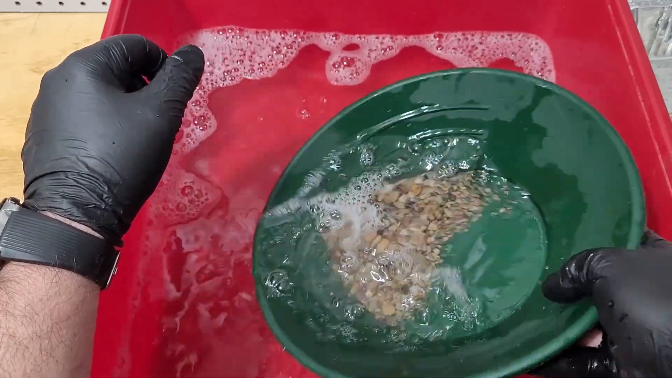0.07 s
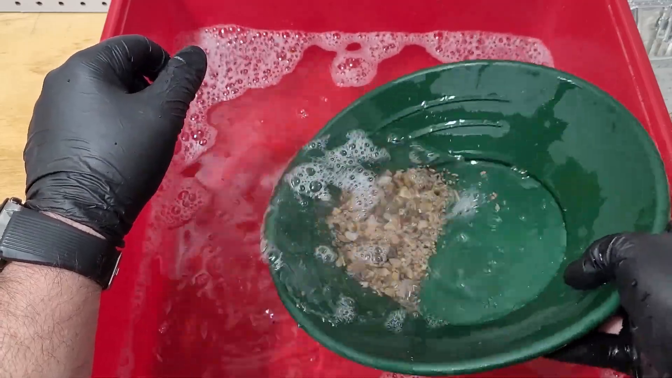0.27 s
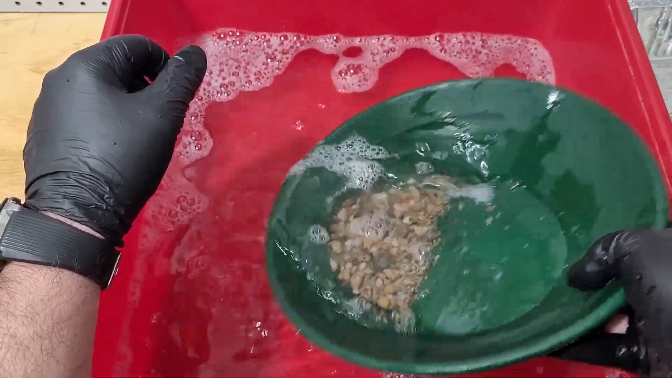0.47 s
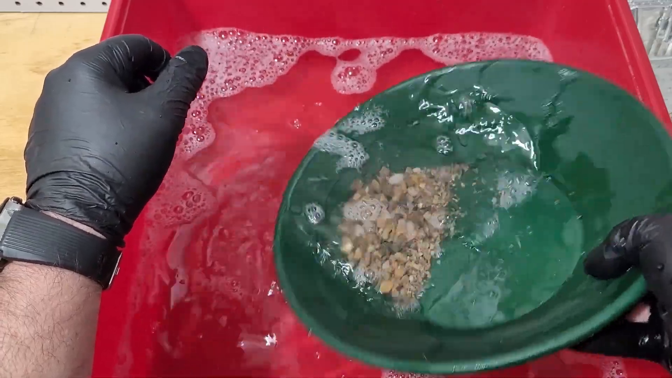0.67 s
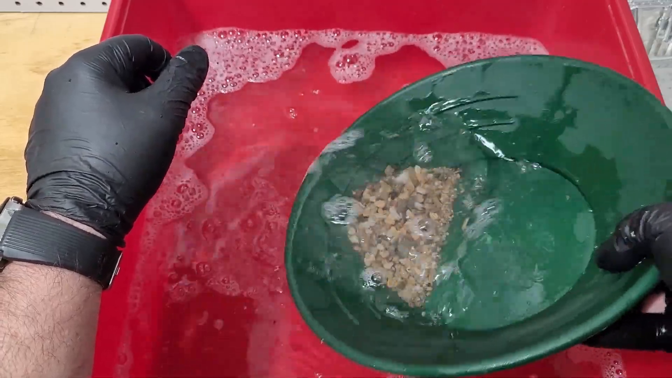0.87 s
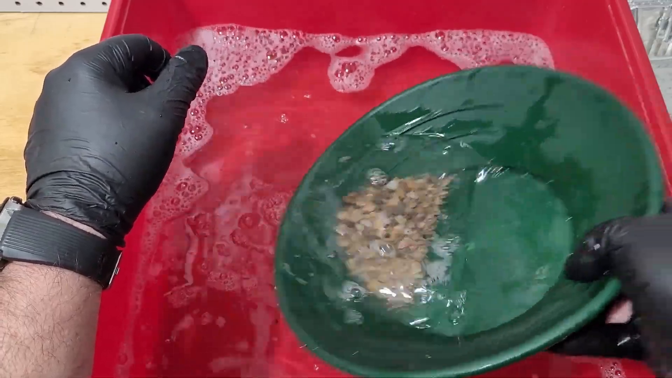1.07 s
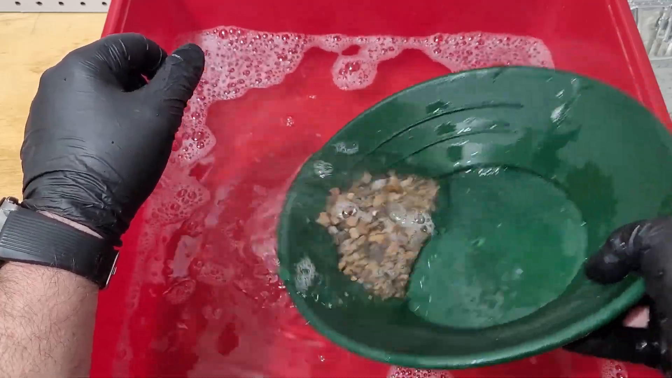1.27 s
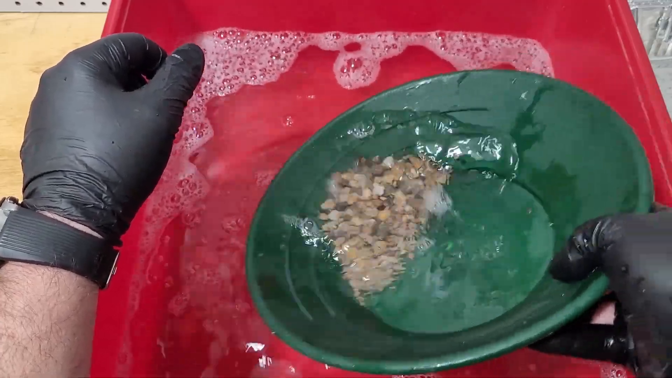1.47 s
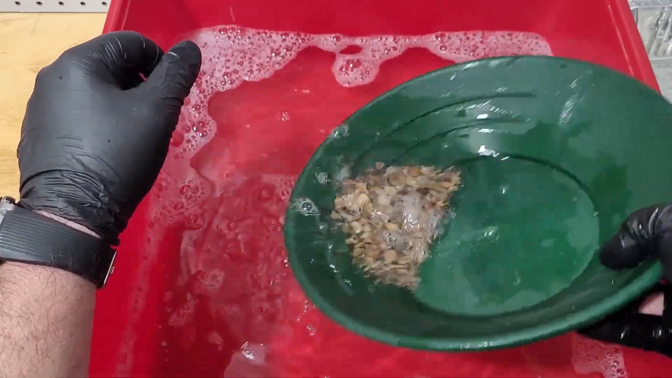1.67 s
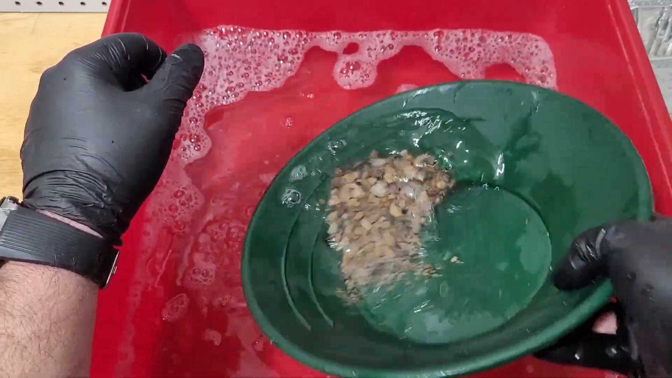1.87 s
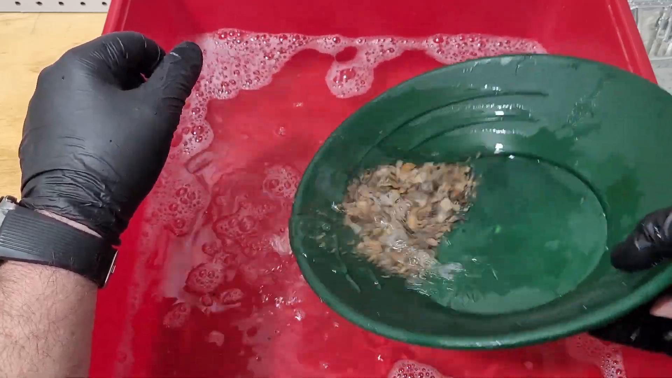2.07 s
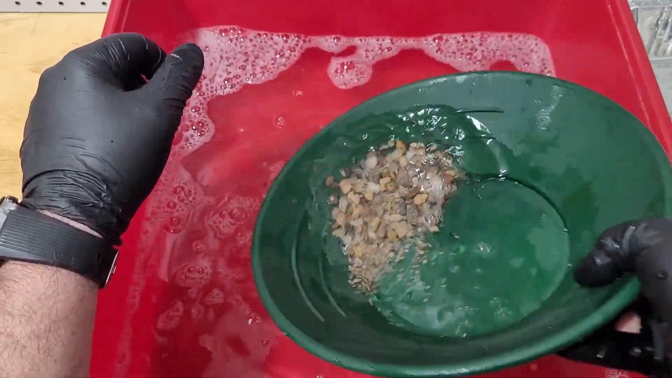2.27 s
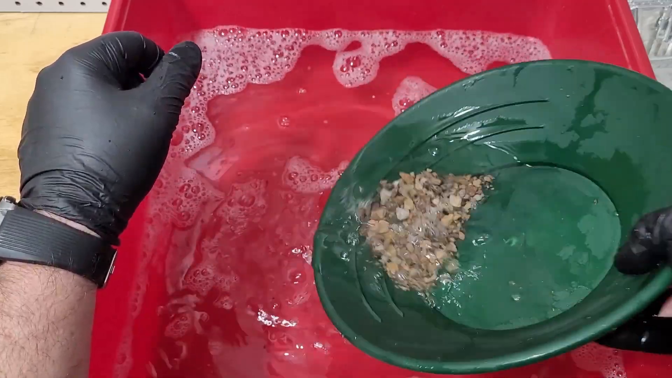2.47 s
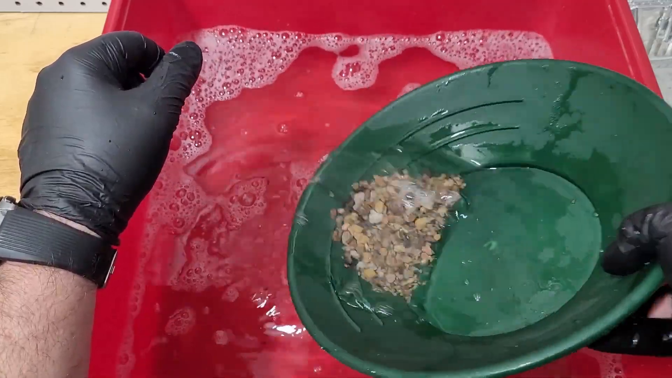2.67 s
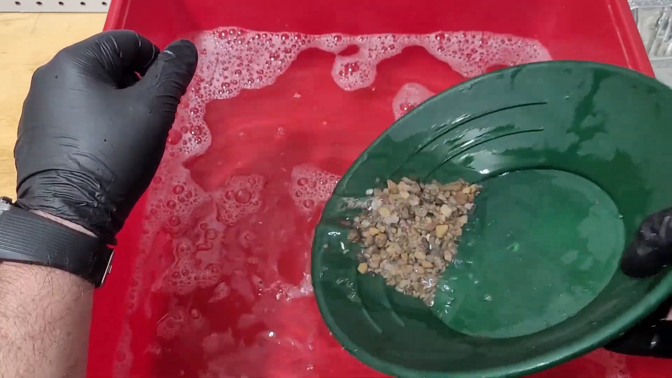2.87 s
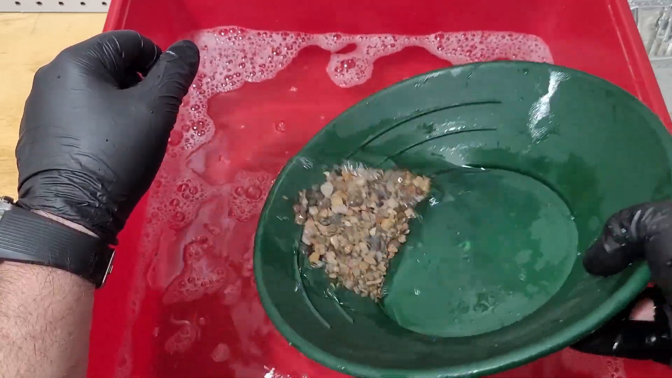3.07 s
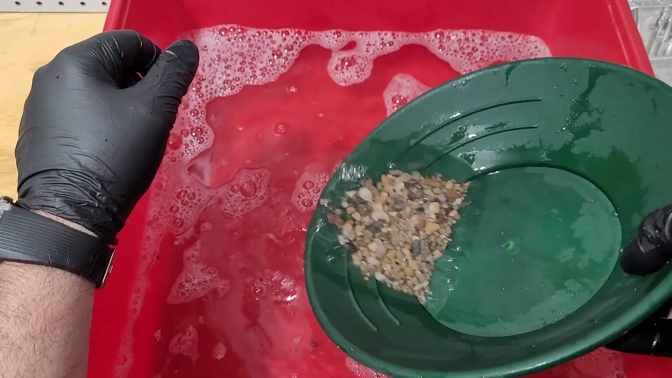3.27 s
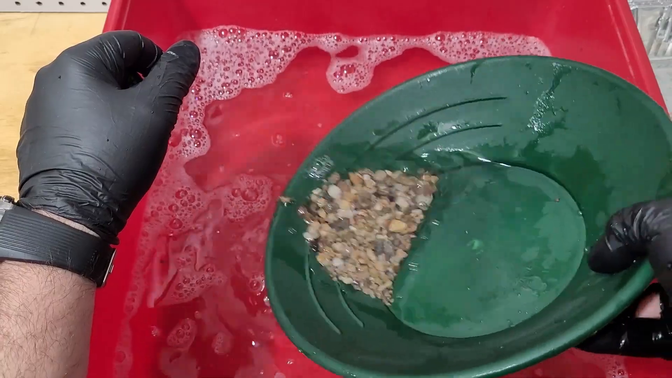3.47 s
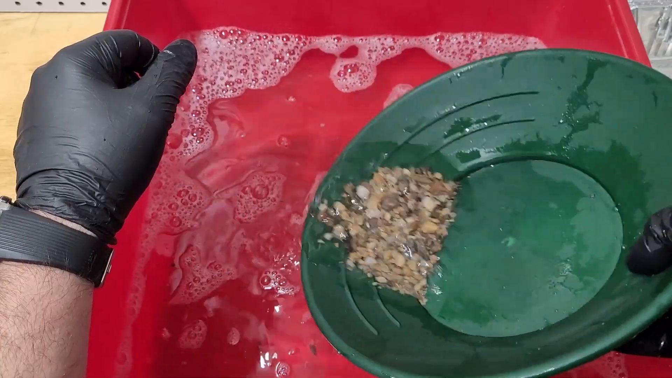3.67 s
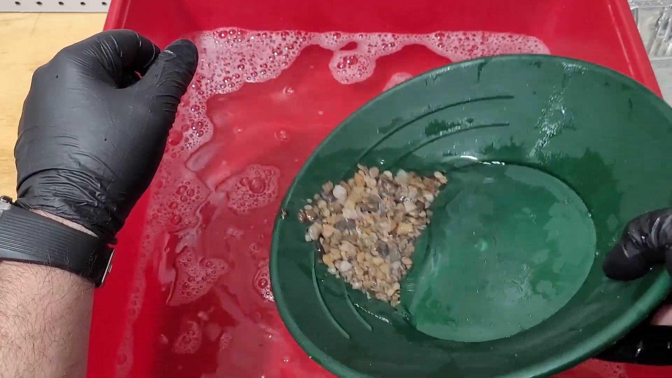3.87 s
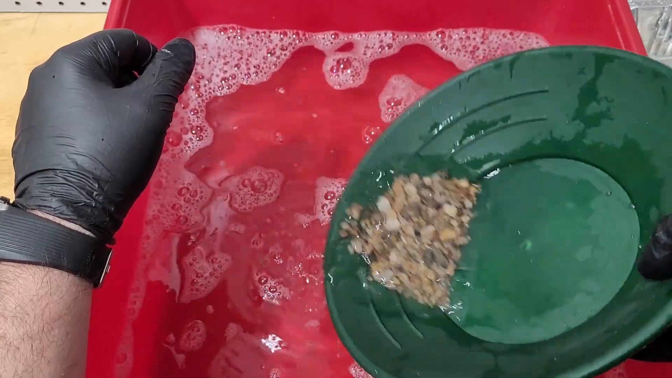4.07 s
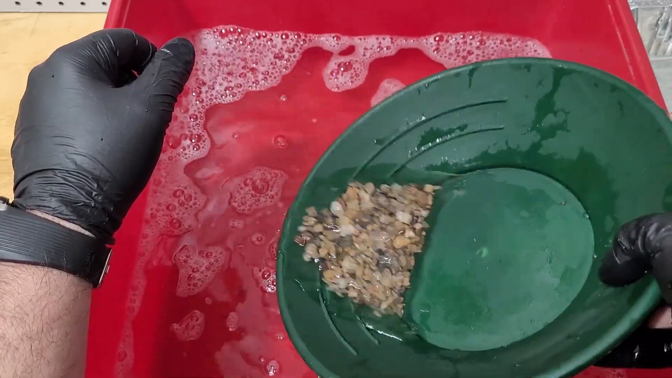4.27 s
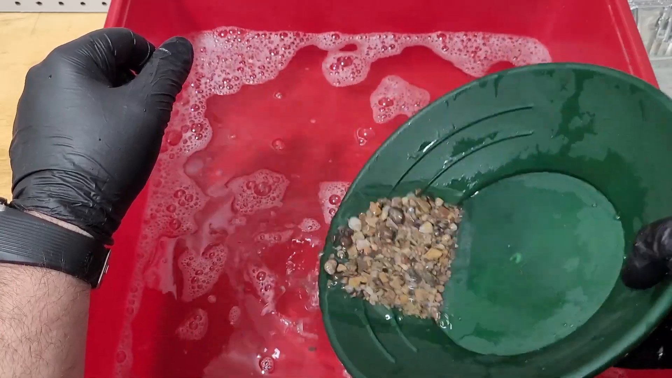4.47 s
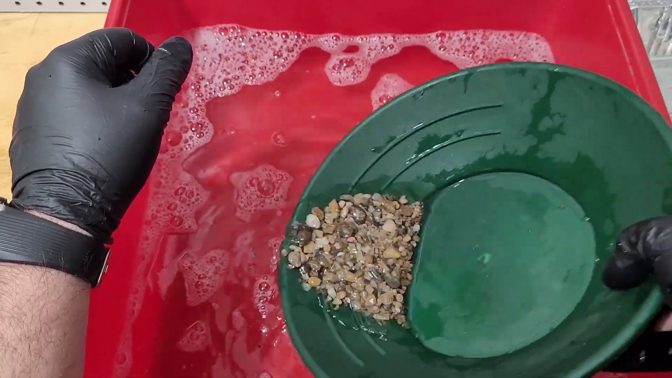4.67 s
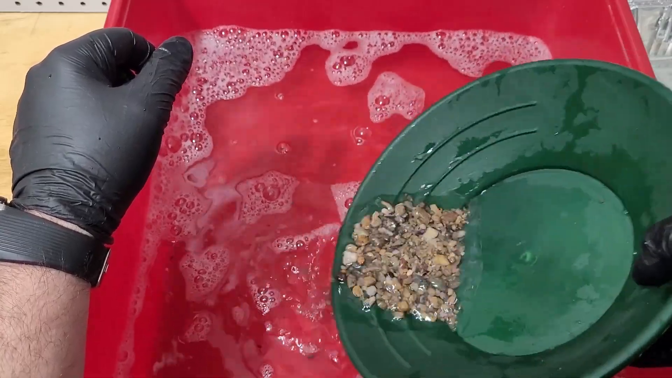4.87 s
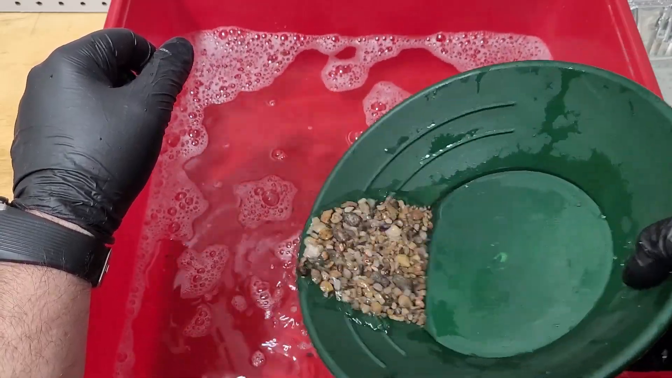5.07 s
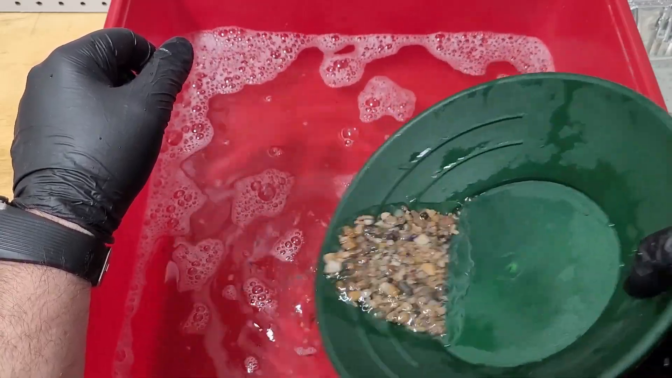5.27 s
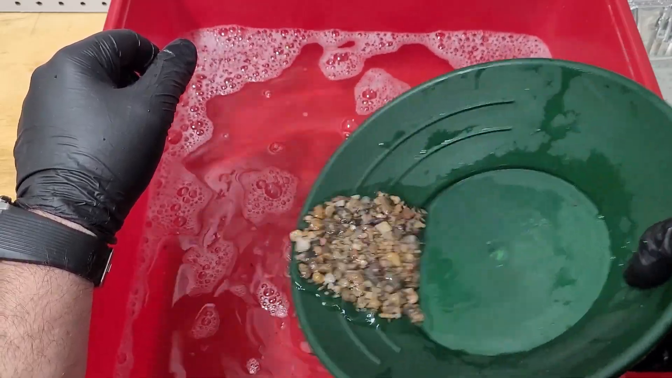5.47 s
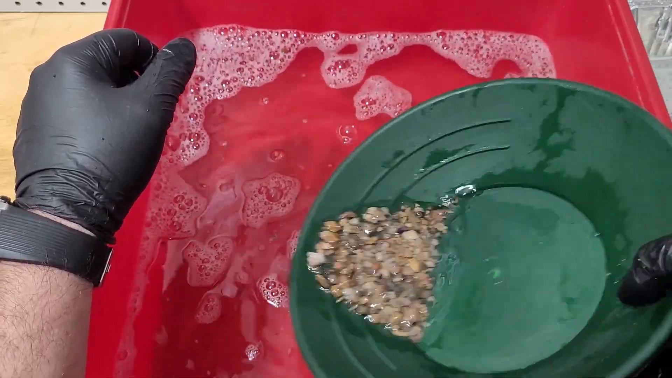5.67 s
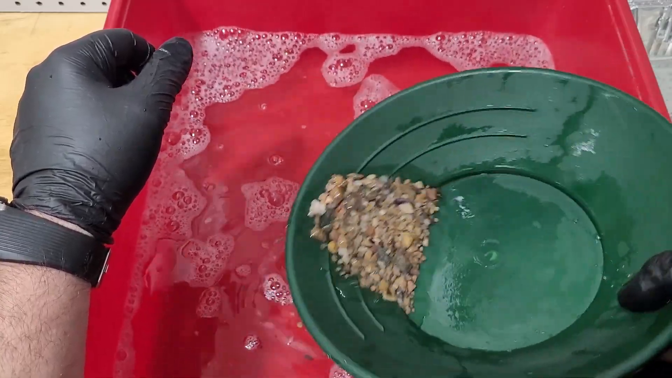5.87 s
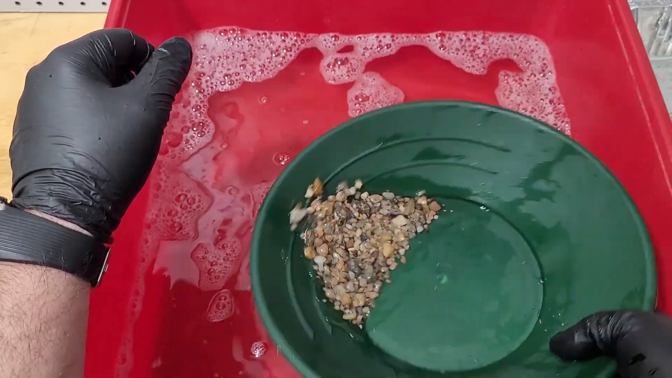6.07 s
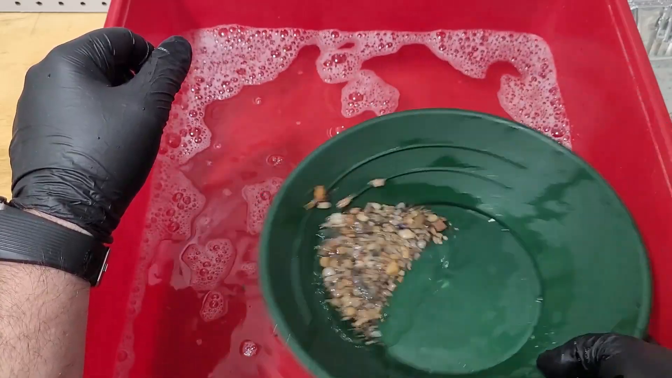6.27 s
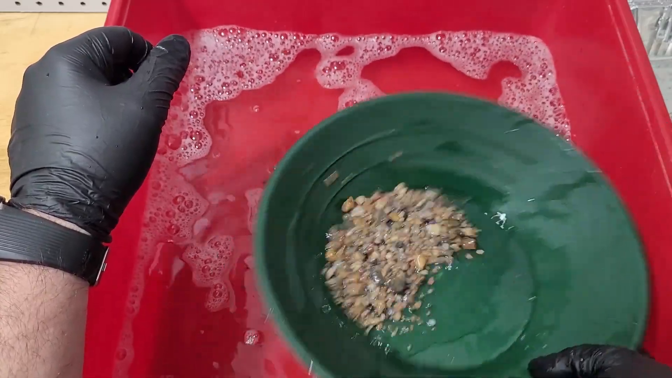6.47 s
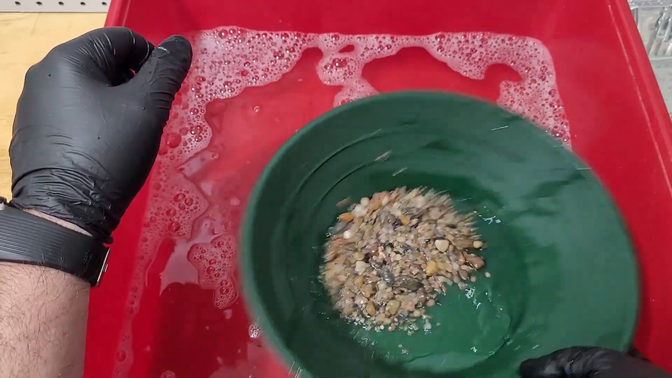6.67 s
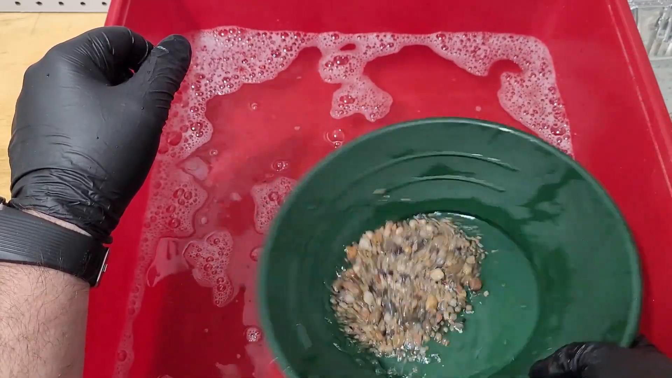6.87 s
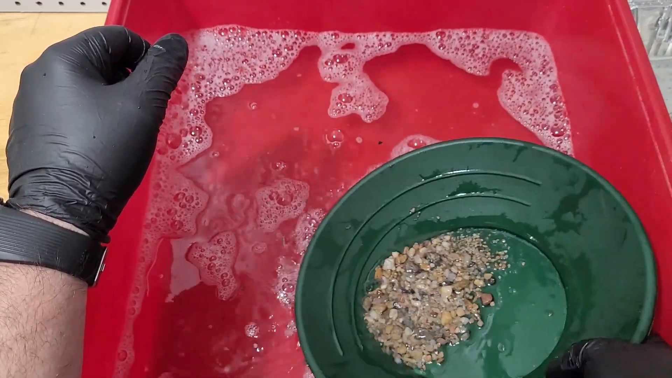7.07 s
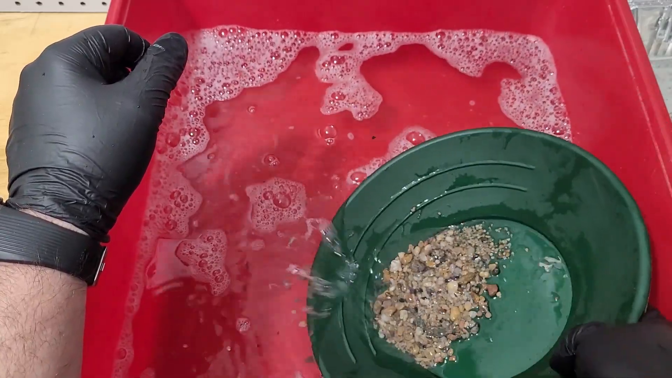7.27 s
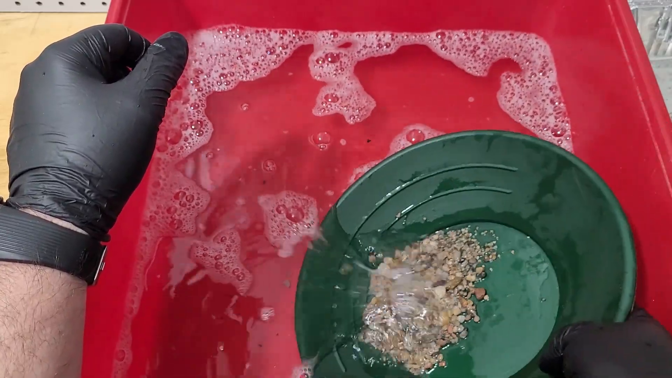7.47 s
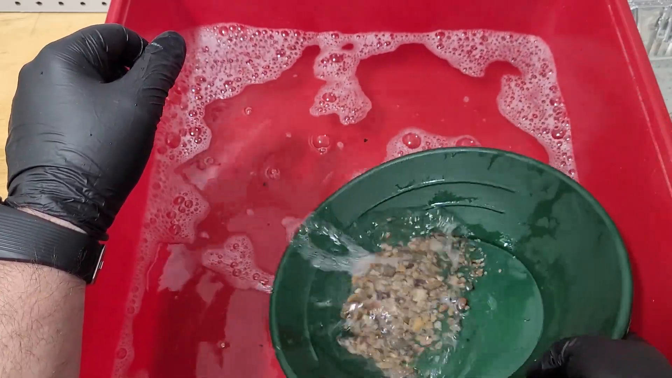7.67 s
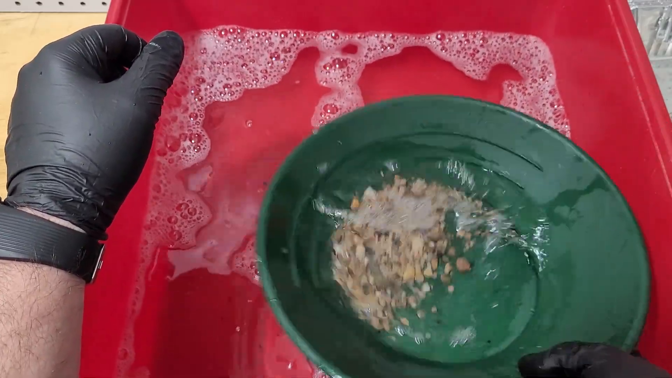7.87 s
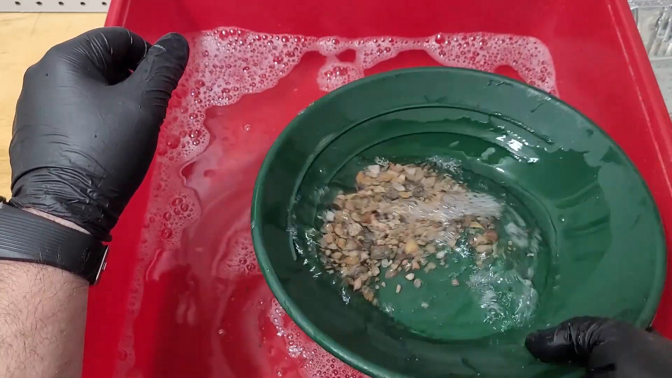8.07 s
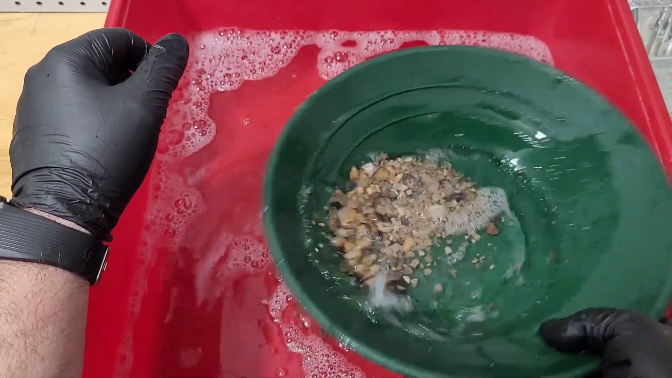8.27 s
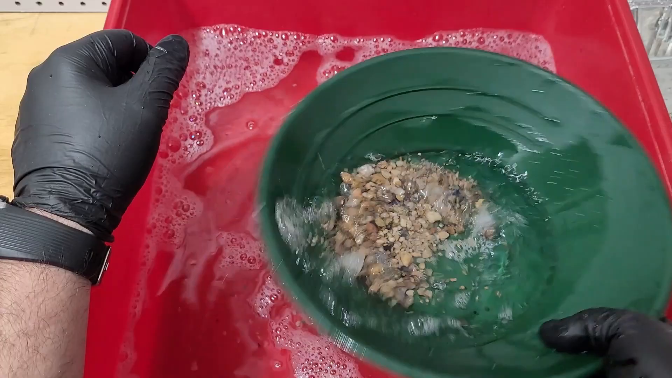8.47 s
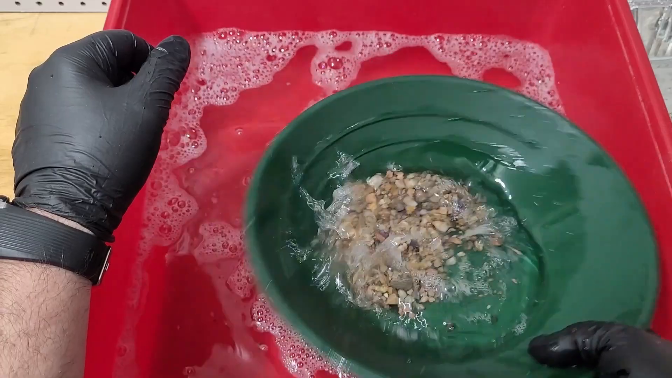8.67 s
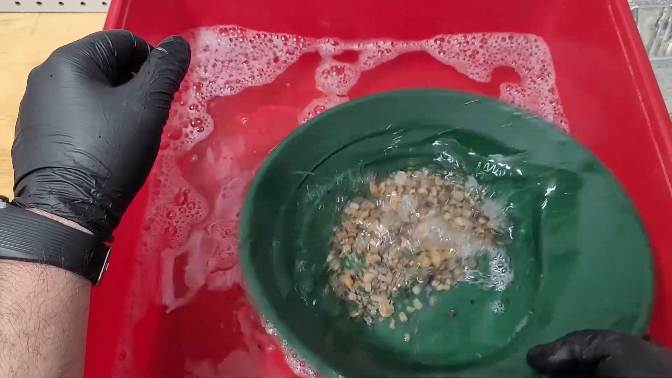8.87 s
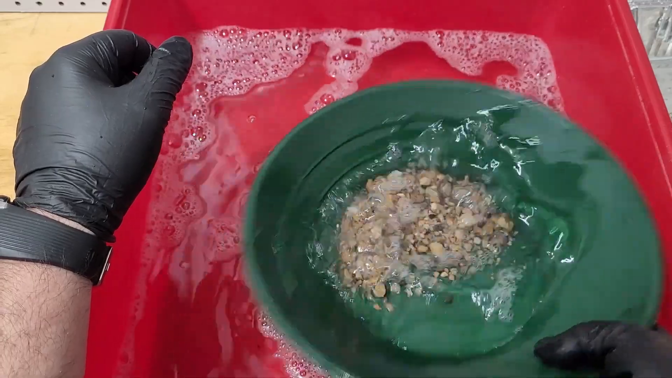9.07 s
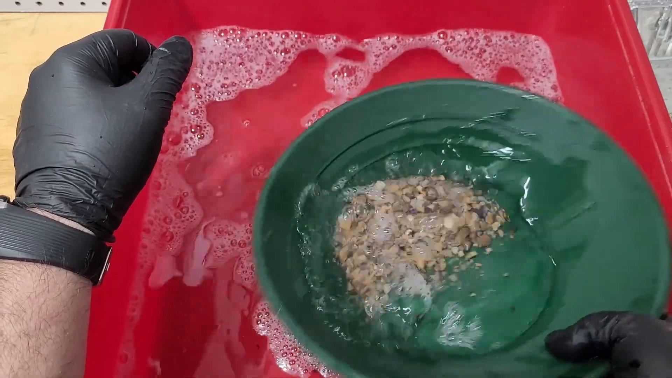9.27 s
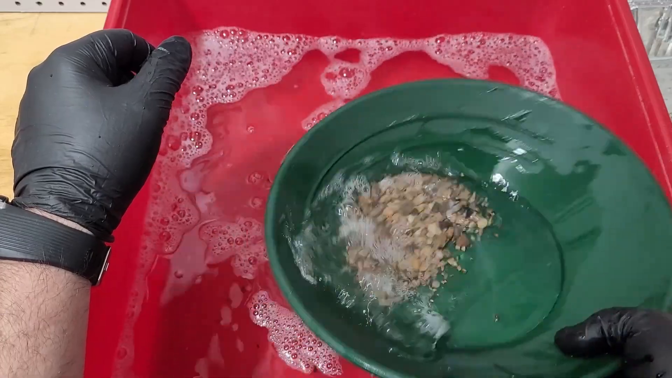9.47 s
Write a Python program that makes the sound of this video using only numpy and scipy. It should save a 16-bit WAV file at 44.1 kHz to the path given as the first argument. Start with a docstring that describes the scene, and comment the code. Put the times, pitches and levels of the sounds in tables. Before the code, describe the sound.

Wet gravel scrapes and rattles in a plastic pan, shaken rhythmically with sloshing water, then faster and louder, with a brief splashy dip between spells.

```python
"""At a tub of water, heard close up in stereo: a plastic pan of wet gravel is shaken, then swung more slowly,
then shaken fast in two spells with a dip of water between. Each stroke drags sand and pebbles over the pan:
dense random clicks are coloured and ring its wall modes. Waves slap the pan and boom in the tub as decaying
noise; air pockets and bubbles ring as sliding sines, low gulps and one high ping. Drops burst in noise and
ping, stones clack, water fizzes in, all over a quiet filtered-noise background."""
import sys
import numpy as np
from scipy import signal
from scipy.fft import rfft, irfft
from scipy.io import wavfile
from scipy.ndimage import uniform_filter1d

SR = 44100
rng = np.random.default_rng(int(sys.argv[2]) if len(sys.argv) > 2 else 0)


def waveform_to_disk(signal):
    """Save audio, clipped to [-1, 1], as 16-bit WAV at the path in sys.argv[1]."""
    frames = np.transpose(np.atleast_2d(signal))
    scaled = np.clip(frames, -1, 1) * 32767
    samples = np.round(scaled).astype(np.int16)
    wavfile.write(sys.argv[1], SR, samples)


N = 420273  # length in samples

# Levels in the tables and settings are nominal: each layer and the final mix trim them further.

# distant surroundings, spectral outline: (f/Hz, relative level/dB)
BACKGROUND = [(25, -19), (60, 0), (115, 2), (190, -6), (280, -2), (450, -2), (640, -9), (800, -1),
              (1200, -17), (2300, -20), (4500, -9), (6500, -12), (7500, -20), (15500, -19)]
# modes of the tub of water: (f/Hz, level/dB, t60/s)
TUB_MODES = [(80.5, -11.5, 0.37), (110, -17, 0.23), (127, -3.5, 0.26), (182, -5.5, 0.23), (223, -9, 0.24),
             (270, -11, 0.34), (319.5, 6, 0.14), (366, -4, 0.1)]
# waves slapping the pan: (t/s, slap level/dB, boom level of the tub/dB)
SLAPS = [(0.241, -49, -76), (0.535, -45, -71), (1.235, -42, -71.5), (1.512, -34, -70), (1.925, -37.5, -71),
         (2.252, -43.5, -67), (2.304, -35, -67), (2.68, -43, -56), (3.041, -37.5, -55), (3.085, -63, -61),
         (3.424, -65, -66.5), (3.884, -49.5, -65), (4.263, -46, -55.5), (4.616, -37, -65.5),
         (4.972, -31.5, -60), (4.989, -43, -51.5), (5.455, -48, -70), (5.723, -39, -64), (7.765, -68, -95),
         (8.677, -46.5, -87)]
# air pockets and bubbles ringing in the water, low gulps and one high ping: (t/s, f/Hz, level/dB, t60/s)
GULPS = [(2.624, 813, -43, 0.088), (2.678, 773, -25.5, 0.06), (2.690, 749, -29, 0.084),
         (3.039, 845, -28.5, 0.037), (3.503, 855, -47.5, 0.14), (3.883, 803, -30, 0.049),
         (4.261, 884, -37, 0.054), (4.655, 745, -52, 0.39), (6.508, 596, -30, 0.041),
         (7.108, 625, -56, 0.069), (7.14, 3320, -64, 0.06), (7.767, 603, -58, 0.048),
         (9.056, 457, -46.5, 0.23)]
# loudest drops and bursting bubbles: (t/s, level/dB, bubble f/Hz, fine mist level/dB)
DROPS = [(0.243, -43.5, 3840, -61), (0.534, -38.5, 3250, -42), (1.2066, -48, 3120, -59),
         (1.2445, -28.5, 6150, -35.5), (1.606, -42, 3870, -50), (2.253, -30.5, 3200, -58),
         (2.6239, -41, 3180, -47), (2.6788, -24.5, 5540, -45), (2.7614, -49, 3700, -65),
         (3.0195, -33.5, 4040, -48), (3.0794, -28, 3690, -44), (3.0823, -29.5, 7000, -40),
         (3.2728, -41, 7700, -48), (3.405, -42, 6800, -59), (3.434, -39, 7400, -49),
         (3.453, -40, 5460, -54), (3.476, -55, 7960, -43.5), (3.501, -52, 6400, -58),
         (4.1817, -52, 6600, -75), (4.262, -37.5, 4380, -40.5), (4.553, -55, 8300, -43),
         (4.9787, -35.5, 6560, -45), (7.139, -58, 3350, -62), (7.673, -58, 4000, -75),
         (7.7136, -51, 3770, -77), (8.139, -53, 8800, -44), (8.5314, -35.5, 6190, -44),
         (8.7053, -34, 7200, -47), (8.8868, -29.5, 3950, -42), (8.9062, -32, 3450, -48)]
# spray of a drop, spectral outline: (f/Hz, relative level/dB)
SPRAY = [(300, -24.5), (2000, -10), (3600, 7.5), (5000, 1), (6800, 8), (9000, -21), (13000, -7),
         (16000, -41)]
# fine mist of a drop, spectral outline: (f/Hz, relative level/dB)
MIST = [(3000, -5.5), (7000, -4.5), (9500, 10), (13000, 6), (16000, -19.5)]
# larger stones clacking on the pan: (t/s, level/dB)
STONES = [(1.5179, -35), (1.8832, -30.5), (2.977, -52), (4.9324, -39), (3.0385, -34), (3.8825, -40.5),
          (4.9601, -30.5), (5.0496, -36), (6.2257, -44), (6.5292, -27), (7.7666, -47), (8.199, -35),
          (8.6747, -35.5), (8.8876, -30), (9.0512, -38.5), (9.38, -34)]
# how much water runs through the load: (t/s, fizz over sand level/dB)
WETNESS = [(0, -6.5), (1.2, -3), (2.3, -7.5), (3, -0.5), (4, -5), (5, -2.5), (6, -10), (7, -16), (7.7, 1.5),
           (8.05, -33), (9.5, -8.5)]
# fizzing water, spectral outline: (f/Hz, relative level/dB)
FIZZ = [(800, -27), (2500, -14), (3300, -3), (4200, -1.5), (5300, -13), (6600, -3), (8000, -3.5),
        (16000, -26)]
# sliding sand, spectral outline: (f/Hz, relative level/dB)
SAND = [(500, -36), (1800, -10), (3400, -1), (5000, -1.5), (5900, -1), (6700, 0), (7500, -2), (9000, 0.5),
        (10700, 0), (11700, -2), (13400, -1), (14300, -7.5), (15000, -12.5), (16000, -24)]
# rattling pebbles, spectral outline: (f/Hz, relative level/dB)
PEBBLES = [(150, -33), (400, -10.5), (900, 1), (1200, -3), (1430, -1), (1720, 1), (2080, 0.5), (2700, -5),
           (3300, -2), (4100, -6), (5200, -14.5), (9000, -17.5), (16000, -26)]
# wall modes of the loaded pan: (f/Hz, level/dB, t60/s)
PAN_MODES = [(323, -17.5, 0.07), (409, -16, 0.067), (450, -9, 0.15), (551.5, 0.5, 0.086),
             (588.5, -5.5, 0.17), (621, -2, 0.083), (692.4, 0.5, 0.059), (749.7, -2.5, 0.14),
             (855.2, 3, 0.083), (934, -6.5, 0.11), (1051, -8, 0.065), (1254, -10, 0.066), (1384, -2, 0.048),
             (1456, 1.5, 0.032), (1680, -2, 0.022), (1910, -2.5, 0.063), (2070, 0, 0.053),
             (2220, 2.5, 0.016), (2410, -3, 0.035), (2590, -7, 0.089), (3246, 4.5, 0.011),
             (3990, -2, 0.019)]
# lift of the pan ring's lower part, its upper part being cut as much: (t/s, level/dB)
PAN_TILT = [(0, 1.5), (1.8, 2.5), (3.5, -4.5), (5, 2), (6.1, -7.5), (6.7, 1), (8.3, 1.5), (9.1, -3)]
# bouts of to-and-fro strokes: (start t/s, end t/s, number of strokes, lengthening per stroke/%,
# dip at the turns/dB, push accent of the sand/dB, pebbles over sand/dB, pan ring over sand/dB,
# push accent of the ring/dB); accents are added on pushes and subtracted on pulls
SHAKES = [(-0.029, 0.506, 4, 5.6, 6.5, -0.6, -4.5, -4.5, 1), (0.508, 1.057, 5, 0.4, 9.5, 0, -3.5, -1, 0.5),
          (1.076, 1.623, 3, 28, 9.5, -0.4, -2, 0, 0), (1.611, 2.516, 5, -7.7, 6, 1.8, -1.5, 0.5, 0),
          (2.521, 5.982, 18, -0.9, 13, 2, 0.7, 3, -1.2), (6.029, 7.02, 10, 1.4, 11, 0.8, 1.8, 0.3, 2),
          (7.968, 9.613, 16, -1.0, 11, -0.4, -1, -2.8, 2.5)]
# vigour of the hand, as the sand in mid stroke before its accent: (t/s, level/dB)
EFFORT = [(0.05, -62.5), (0.44, -55), (0.56, -50.5), (0.7, -56), (1.14, -58), (1.5, -52.5), (2.45, -51.5),
          (2.64, -67), (3.04, -57), (3.25, -58.5), (3.64, -63), (4.23, -65.5), (4.42, -56), (4.9, -53),
          (5.16, -59), (5.7, -53), (5.88, -70), (6.06, -46.5), (6.36, -45), (6.7, -42), (6.98, -46),
          (8.02, -53), (8.5, -46.5), (9.5, -50.5)]

BACKGROUND_DB = -74
TOP_HZ = 15800  # top of the recorder's band and highest bubble pitch
START_DB_PER_S, SETTLE_DB_PER_S = 415, 169  # how fast the load starts before a stroke and settles after
REST_DB = -100  # the load lying still
# the pan is dipped and water runs in over its rim
INFLOW_S, INFLOW_DB, INFLOW_RISE_DB_PER_S, INFLOW_FALL_DB_PER_S = 7.72, -71.5, 114, 45
DROP_T60_S, SLAP_T60_S = 0.031, 0.056


def undb(db):
    """Decibels to gain."""
    return 10 ** (np.asarray(db) / 20)


def unit(x):
    """Scale to rms 1."""
    return x / np.sqrt(np.mean(x ** 2))


def seconds(length):
    """Time axis of a short sound."""
    return np.arange(int(length * SR) + 2) / SR


def fade(t, t60):
    """Exponential decay, 60 dB down after t60."""
    return np.exp(-np.log(1000) * t / t60)


def add(track, at, sound):
    """Mix a sound into the track at a time in seconds."""
    i = int(np.clip(at * SR, 0, N - 1))
    track[i:i + len(sound)] += sound[:N - i]


def through(x, response):
    """Pass a sound through an impulse response."""
    return signal.oaconvolve(x, response)[:len(x)]


def follow(table):
    """Draw a (t/s, level/dB) table out over the whole scene."""
    return np.interp(np.arange(N) / SR, *np.transpose(table))


def colour(points, size=1024):
    """Causal minimum-phase response of unit energy with the given (f/Hz, level/dB) outline."""
    hz, db = np.transpose(points)
    bins = np.maximum(np.arange(size // 2 + 1) * SR / size, 1)
    outline = undb(np.interp(np.log(bins), np.log(hz), db))
    # folding the cepstrum forward makes the response causal
    cepstrum = irfft(np.log(outline))
    cepstrum[1:size // 2] *= 2
    cepstrum[size // 2 + 1:] = 0
    response = irfft(np.exp(rfft(cepstrum)))
    return response / np.linalg.norm(response)


def ring(modes, swell_cycles=0.0102):
    """Unit-energy response of a body: neighbouring modes swing oppositely and build up over swell_cycles."""
    t = seconds(.4)
    response = np.zeros(len(t))
    for k, (hz, db, t60) in enumerate(modes):
        swell = 1 - np.exp(-t * hz / swell_cycles)
        response += (-1) ** k * undb(db) * fade(t, t60) * np.sin(2 * np.pi * hz * t) * swell
    return response / np.linalg.norm(response)


def pan_rings():
    """The heavy load bends the pan in its low modes; single hard pebbles reach the high ones."""
    edge_hz = 1150
    low_modes = [mode for mode in PAN_MODES if mode[0] < edge_hz]
    high_modes = [mode for mode in PAN_MODES if mode[0] >= edge_hz]
    return ring(low_modes), ring(high_modes)


def walk(rate):
    """Random drift with a spread near 1, straight between knots at the given rate per second."""
    knots = np.arange(N) / SR * rate
    return np.interp(knots, np.arange(8000), rng.standard_normal(8000))


def contacts(rate, spread_db):
    """Random clicks of uneven size, mean power 1; the rate per second may move."""
    share = np.clip(rate / SR, 1e-4, 1)
    sign = rng.choice([-1, 1], N)
    size = undb(spread_db * np.minimum(rng.exponential(size=N), 4)) * sign
    # fewer clicks are made larger, so that the rate leaves the level alone
    return unit((rng.random(N) < share) * size / np.sqrt(share))


def bubble(hz, t60, glide, onset_cycles):
    """A ringing air bubble whose pitch slides by the share glide over t60."""
    t = seconds(t60)
    pitch = np.minimum(hz * (1 + glide * t / t60), TOP_HZ)
    swell = 1 - np.exp(-t * hz / onset_cycles)
    return np.sin(2 * np.pi * np.cumsum(pitch) / SR) * fade(t, t60) * swell


def bubbles(level_db, count, low_hz, high_hz, cycles, glide, spread_db):
    """Bubbles of random time, pitch, size and life, following a moving level."""
    out = np.zeros(N)
    for when, pitch, size, life in rng.random((count, 4)):
        hz = low_hz * (high_hz / low_hz) ** pitch
        t60 = cycles * (.5 + life) / hz
        db = level_db[int(when * N)] - spread_db * np.log(max(size, .04))
        add(out, when * N / SR, undb(db) * bubble(hz, t60, glide, 0.97))
    return out


def background():
    """Steady low rumble and faint hiss of the surroundings, as coloured noise."""
    return undb(BACKGROUND_DB) * through(rng.standard_normal(N), colour(BACKGROUND, size=8192))


def reflections(x, t60=0.13, gap_s=0.0019):
    """Short scatter from the tub walls and nearby surfaces, as a decaying noise response."""
    t = seconds(.3)
    tail = rng.standard_normal(len(t)) * fade(t, t60) * (t > gap_s)
    return through(x, tail / np.linalg.norm(tail))


def tub(push_s=0.00078, churn_t60=0.32):
    """Each wave shoves the tub once and churns on; its lowest modes swell last."""
    pushes = np.zeros(N)
    t = seconds(.3)
    for at, _, boom_db in SLAPS:
        shove = np.exp(-t / push_s)
        churn = undb(-12) * rng.standard_normal(len(t)) * fade(t, churn_t60)
        add(pushes, at, undb(boom_db) * (shove + churn))
    # water heaving under the pan
    hollow = colour([(120, -27), (300, -7), (410, -4.5), (520, -1), (800, -27), (4000, -55)])
    boom = through(pushes, ring(TUB_MODES, swell_cycles=2.8))
    return undb(2.5) * boom + undb(3.5) * through(pushes, hollow)


def slaps(rise_s=0.0016):
    """A wave throws the wet load against the pan wall."""
    blows = np.zeros(N)
    t = seconds(.3)
    for at, db, _ in SLAPS:
        swell = 1 - np.exp(-t / rise_s)
        add(blows, at, undb(db) * rng.standard_normal(len(t)) * fade(t, SLAP_T60_S) * swell)
    slosh = colour([(100, -25.5), (250, -18), (450, 8), (650, 5.0), (1200, 2.5), (5000, -46)])
    low_ring, _ = pan_rings()
    wall = undb(-5.5) * through(blows, low_ring)
    rattle = undb(-3.5) * through(blows, colour(PEBBLES))
    return wall + rattle + undb(-3.0) * through(blows, slosh)


def gulps():
    """Air pockets and bubbles ring at a slightly sinking pitch: low gulps and one high ping."""
    out = np.zeros(N)
    for at, hz, db, t60 in GULPS:
        add(out, at, undb(db) * bubble(hz, t60, -0.032, 1.0))
    return out


def drops():
    """Each drop bursts in a short spray and a fine mist, with a pinging bubble."""
    out, spray, mist = np.zeros(N), colour(SPRAY), colour(MIST)
    t = seconds(.08)
    # a hard first crack over a softer, longer patter
    envelope = fade(t, DROP_T60_S) + undb(3.5) * fade(t, 0.0056)
    for at, db, hz, mist_db in DROPS:
        burst = rng.standard_normal((2, len(t))) * envelope
        add(out, at, undb(db - 10.0) * through(burst[0], spray))
        add(out, at, undb(mist_db - 2.5) * through(burst[1], mist))
        add(out, at, undb(db + 1.0) * bubble(hz, .5 * DROP_T60_S, 0.15, 1.4))
    return out


def stones(t60=0.016):
    """A big stone lands, chatters briefly and rings the pan."""
    blows = np.zeros(N)
    t = seconds(.06)
    for at, db in STONES:
        add(blows, at, undb(db) * rng.standard_normal(len(t)) * fade(t, t60))
    low_ring, high_ring = pan_rings()
    clack = undb(-5) * through(blows, colour(PEBBLES))
    return clack + undb(-17.0) * through(blows, high_ring) + undb(-11.5) * through(blows, low_ring)


def inflow(reach_s=0.019, stir_rise_db_per_s=330):
    """Water fizzes in over the rim, then reaches the gravel and stirs it."""
    t = np.arange(N) / SR - INFLOW_S
    late = t - reach_s
    rim_db = INFLOW_DB + np.minimum(INFLOW_RISE_DB_PER_S * t, -INFLOW_FALL_DB_PER_S * t)
    stir_db = INFLOW_DB + np.minimum(stir_rise_db_per_s * late, -INFLOW_FALL_DB_PER_S * late)
    hiss = through(contacts(3000, 2.5) * undb(rim_db + 2), colour(SAND))
    fizz = through(contacts(900, 2.5) * undb(rim_db + 1.0), colour(FIZZ))
    pops = bubbles(rim_db + 13, count=600, low_hz=3240, high_hz=4400, cycles=63, glide=0.08, spread_db=2.5)
    stirred = contacts(800, 2.3) * undb(stir_db)
    low_ring, _ = pan_rings()
    pebbles = undb(3.0) * through(stirred, colour(PEBBLES))
    return hiss + fizz + pops + pebbles + undb(3.5) * through(stirred, low_ring)


def wash(sand_db, pan_db):
    """Water running through the gravel fizzes, pops small bubbles and gurgles."""
    wet_db = sand_db + follow(WETNESS)
    fizz = through(contacts(1500, 3.2) * undb(wet_db - 0.5 + 2 * walk(160)), colour(FIZZ))
    pops = bubbles(wet_db + 13.5, count=900, low_hz=2994, high_hz=11200,
                   cycles=42, glide=0.091, spread_db=2.0)
    gurgles = bubbles(wet_db + pan_db + 0.5, count=150, low_hz=474, high_hz=787,
                      cycles=26, glide=0.072, spread_db=5.5)
    return fizz + pops + gurgles


def strokes():
    """Every stroke as (start, end, traits of its bout); the pace changes evenly through a bout."""
    for start, end, count, slowing_percent, *traits in SHAKES:
        lengths = (1 + slowing_percent / 100) ** np.arange(count)
        turns = start + (end - start) * np.append(0, np.cumsum(lengths)) / lengths.sum()
        for begin, finish in zip(turns, turns[1:]):
            yield begin, finish, traits


def motion(arch=1.1, skew=1.1):
    """Levels of sand, pebbles and pan: pulls and pushes alternate; the load stalls at turns, slides between."""
    t = np.arange(N) / SR
    sand, shares = np.full(N, float(REST_DB)), []
    for k, (start, end, traits) in enumerate(strokes()):
        dip_db, push_db, pebble_db, pan_db, pan_push_db = traits
        middle = (start + end) / 2
        push = 1 if k % 2 else -1
        near = slice(*np.searchsorted(t, [start - .2, end + .5]))
        along = np.clip((t[near] - start) / (end - start), 0, 1)
        speed = np.abs(np.sin(np.pi * along ** skew)) ** arch
        before_db = START_DB_PER_S * np.maximum(start - t[near], 0)
        after_db = SETTLE_DB_PER_S * np.maximum(t[near] - end, 0)
        crest_db = np.interp(middle, *np.transpose(EFFORT)) + push * push_db
        stroke_db = crest_db - dip_db * (1 - speed) - before_db - after_db
        sand[near] = np.maximum(sand[near], stroke_db)
        shares.append((middle, pebble_db, pan_db + push * pan_push_db))
    middles, pebbles, pan = np.transpose(shares)
    return sand, np.interp(t, middles, pebbles), np.interp(t, middles, pan)


def sway(x, split_hz=700, depth_db=3.5):
    """The shifting load damps now the lower, now the upper modes of the pan."""
    lower = signal.sosfiltfilt(signal.butter(3, split_hz, fs=SR, output="sos"), x)
    tilt = undb(follow(PAN_TILT) + depth_db * walk(12.0))
    return lower * tilt + (x - lower) / tilt


def gravel(sand_db, pebble_db, pan_db, lag_share=0.32):
    """Sand hisses, pebbles rattle and both ring the pan; a faster slide makes more contacts."""
    flow = undb(.7 * (sand_db + 55))
    clumps = walk(140)
    low_ring, high_ring = pan_rings()
    # heavy stones keep rolling through the turns, so their level is steadier than the sand's
    rolling_db = sand_db + lag_share * (uniform_filter1d(sand_db, SR // 6) - sand_db)
    sand = through(contacts(11000 * flow, 2.9), colour(SAND)) * undb(sand_db + 1.0 + 1.76 * clumps)
    rattle = undb(sand_db + pebble_db + 1.0 * clumps + 1.6 * walk(200))
    pebbles = undb(-4.5) * through(contacts(2000 * flow, 1.44) * rattle, colour(PEBBLES))
    pebbles += undb(-5.0) * through(contacts(600 * flow, 4.2) * rattle, high_ring)
    knocks = contacts(1100 * flow, 3.7) * undb(rolling_db + pan_db + 1.0 * clumps)
    return sand + pebbles + undb(-1.34) * sway(through(knocks, low_ring))


def scene(right_db=3.0):
    """Close pan straight ahead; tub boom and background lean right, with a wide layer of background."""
    sand_db, pebble_db, pan_db = motion()
    hits = drops() + stones() + slaps() + gulps()
    near = gravel(sand_db, pebble_db, pan_db) + wash(sand_db, pan_db) + inflow() + hits
    boom, air = tub(), undb(-2.5) * background()
    mid = near + undb(-11.5) * reflections(hits)
    # the low notes linger around the tub and arrive from all sides
    around = colour([(100, 21.0), (430, 38), (600, -11.5), (1500, -41.0), (16000, -37)])
    lows = through(reflections(near), around)
    # the rumble is alike on both sides, the faint hiss is not
    wide = colour([(40, -33.5), (300, -13), (800, -2.0), (3000, -14), (16000, 4)])
    wide_air = through(background(), wide)
    side = undb(-34) * lows + undb(-31) * reflections(hits) + undb(1) * wide_air
    # left and right gains, right_db apart
    aside = undb(np.array([[-right_db], [right_db]]) / 2)
    return np.array([mid + side, mid - side]) + aside * (boom + air)


def record(dry):
    """The recorder cuts the top with a steep low-pass."""
    return signal.sosfilt(signal.ellip(10, .2, 70, TOP_HZ, fs=SR, output="sos"), dry)


dry = scene()
out = record(dry)
waveform_to_disk(out)
```